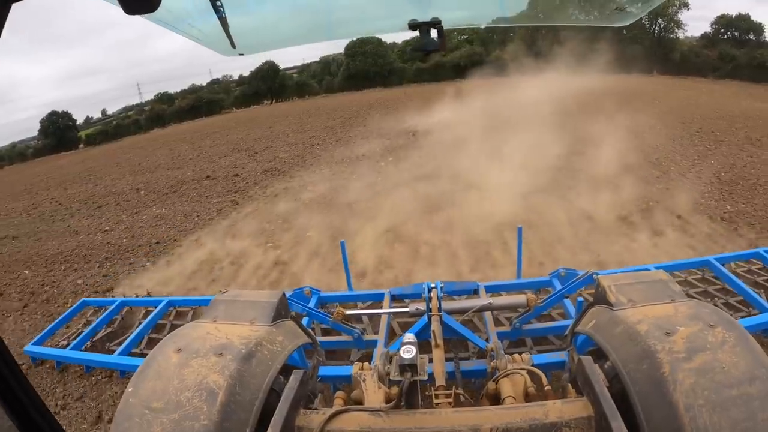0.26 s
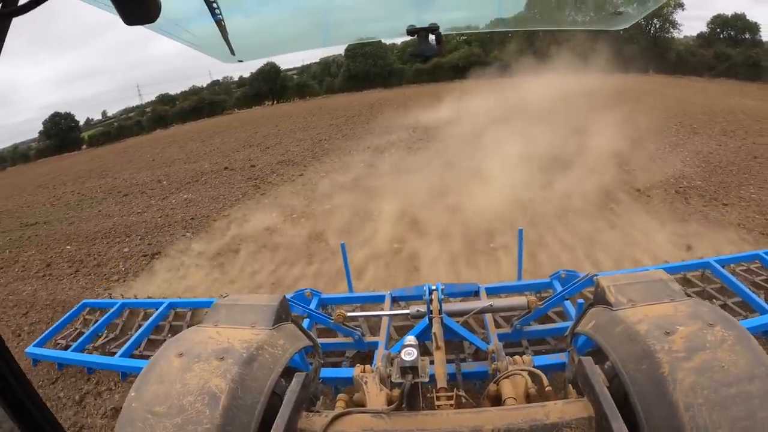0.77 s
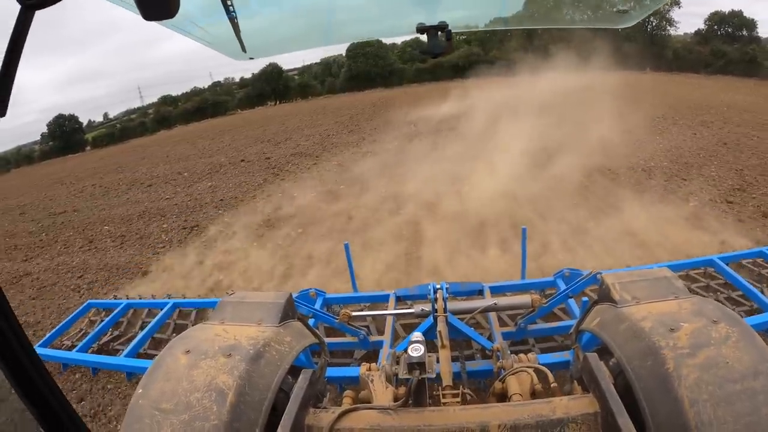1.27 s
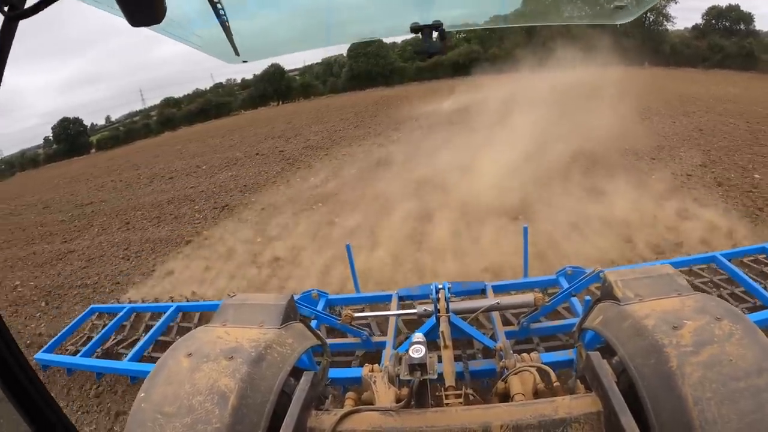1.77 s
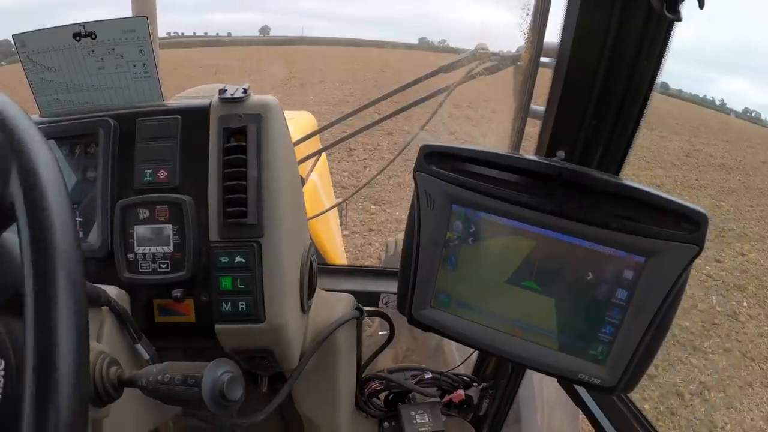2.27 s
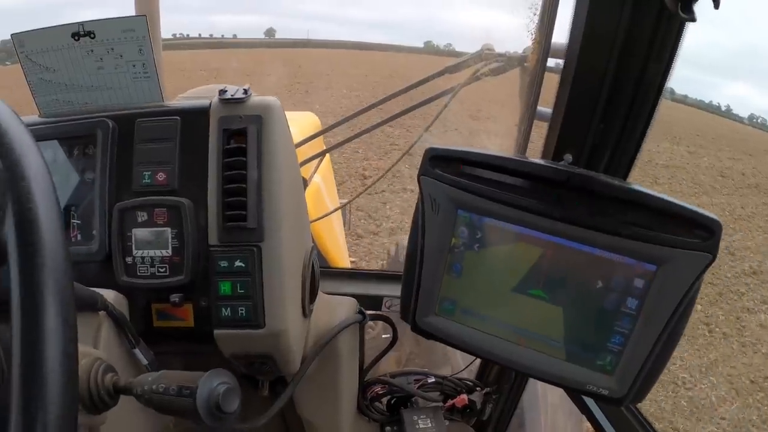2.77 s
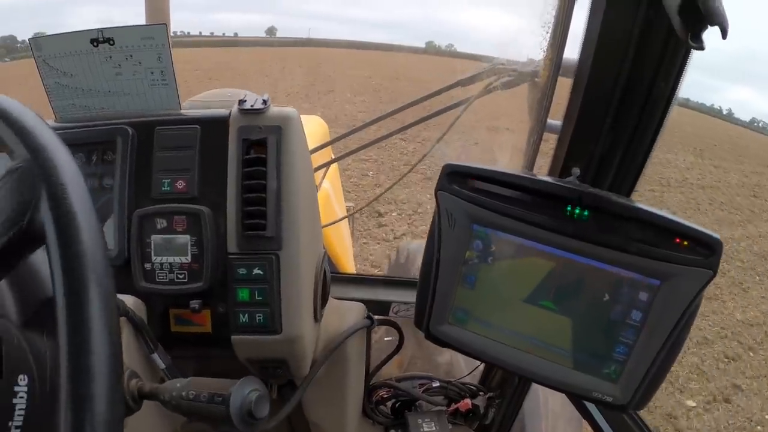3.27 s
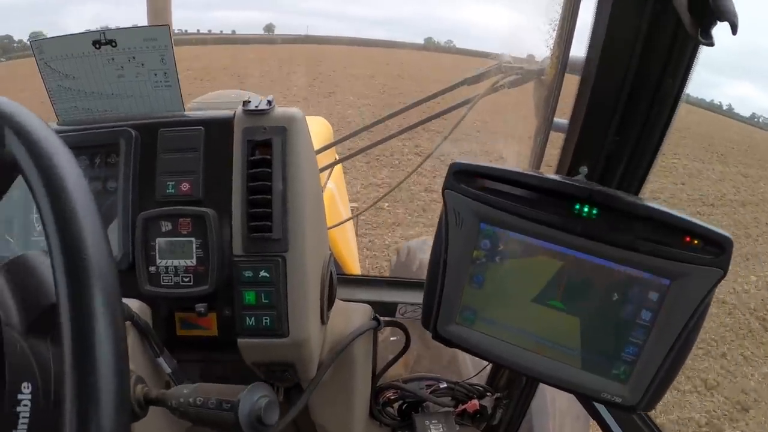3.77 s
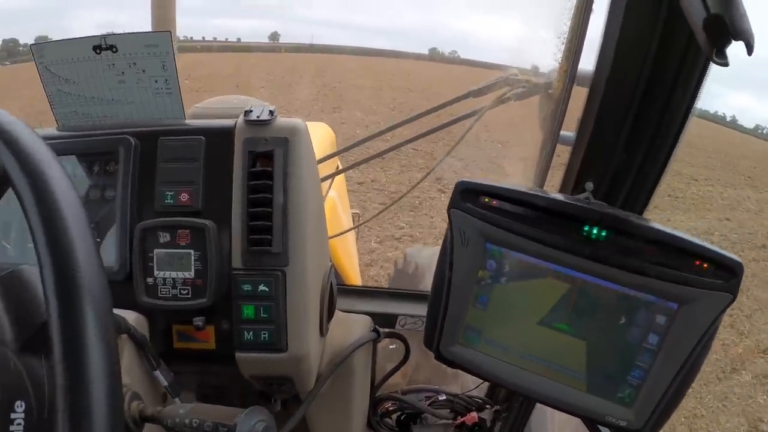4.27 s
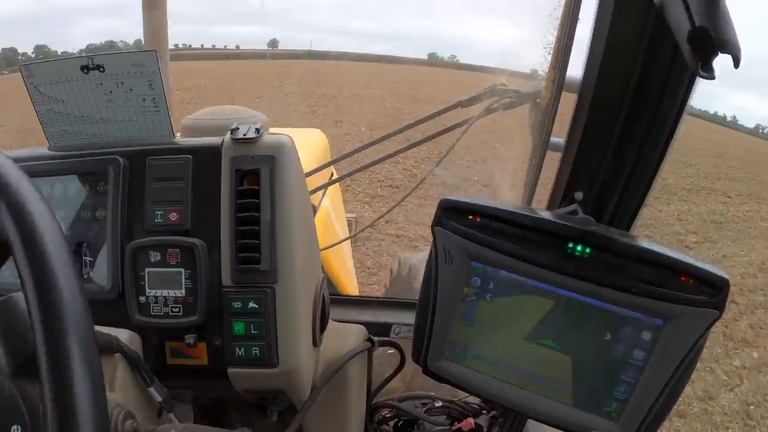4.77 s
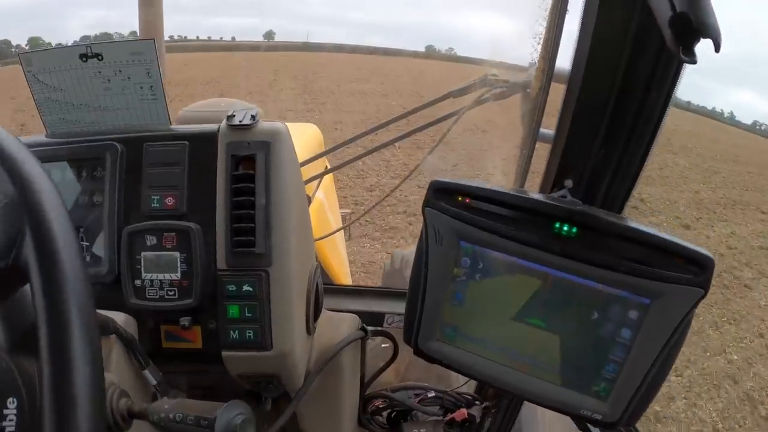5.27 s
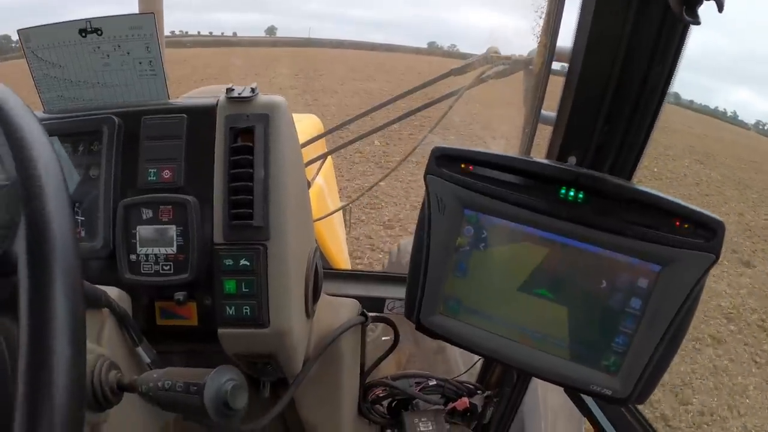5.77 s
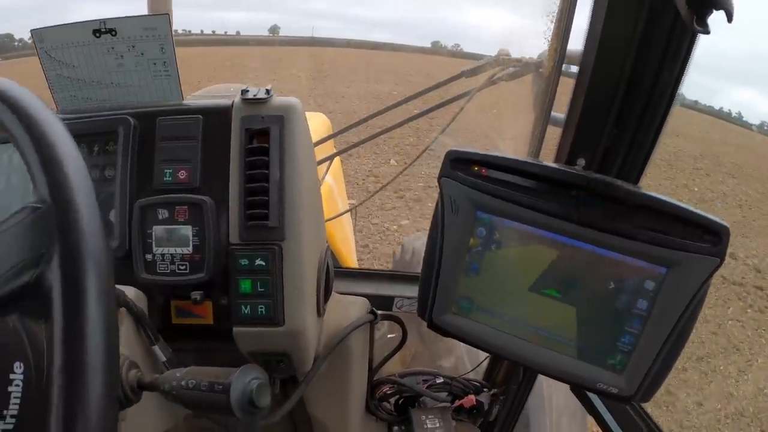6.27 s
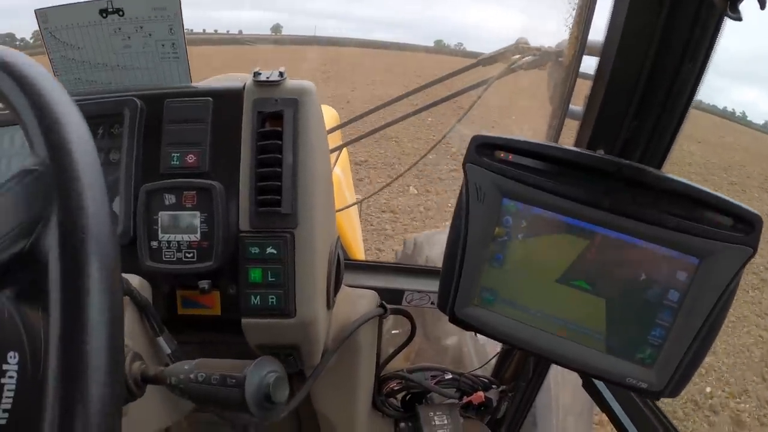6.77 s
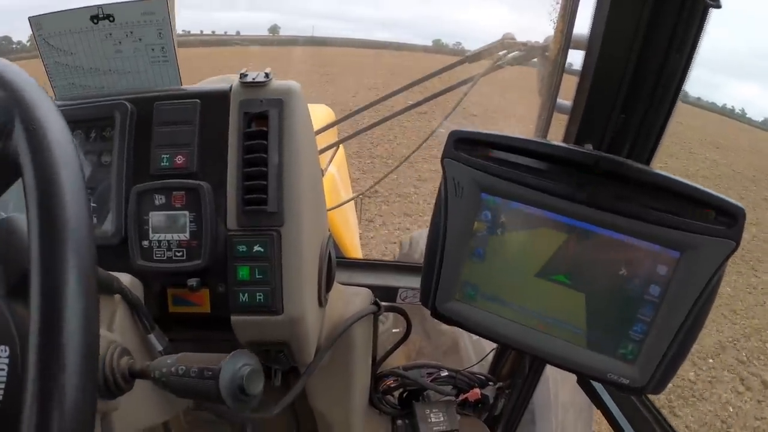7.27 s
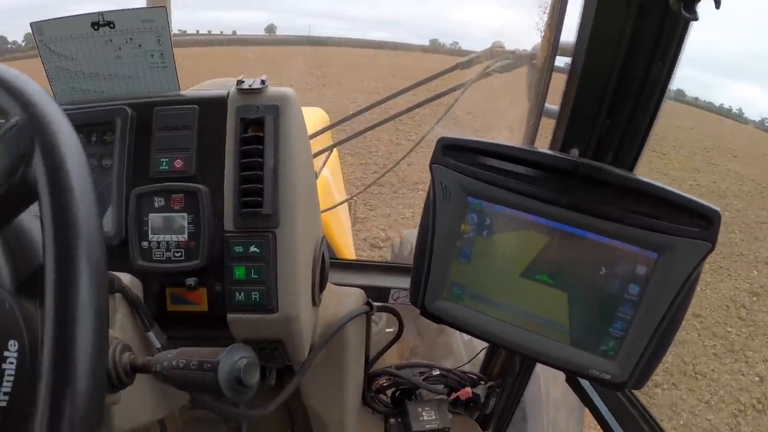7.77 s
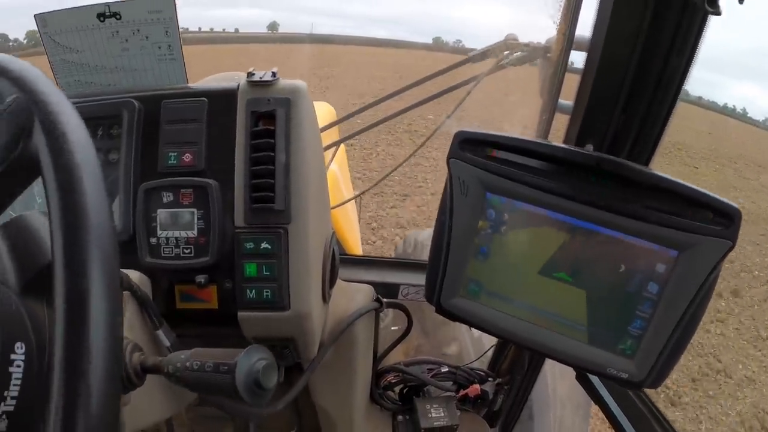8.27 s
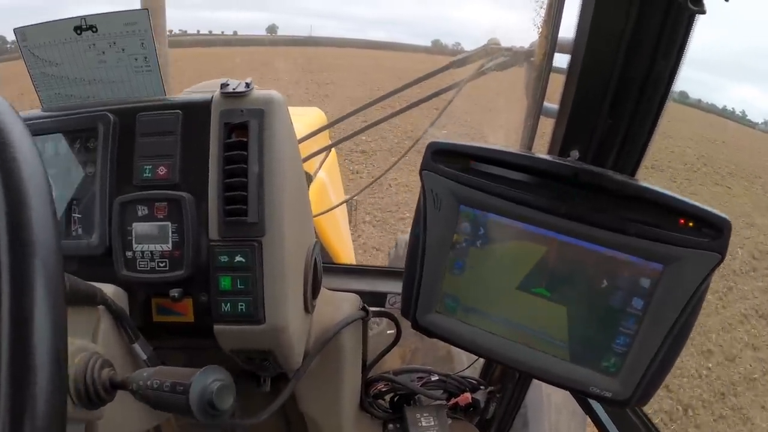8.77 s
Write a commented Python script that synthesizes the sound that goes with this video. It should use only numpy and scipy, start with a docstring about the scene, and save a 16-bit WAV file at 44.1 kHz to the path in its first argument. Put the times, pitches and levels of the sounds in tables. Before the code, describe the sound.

A tractor engine drones steadily under load with harrows scraping and clinking behind, then a cut into the cab brings boomier rumble and pump whine.

```python
"""A six-cylinder tractor drags harrows over dry soil at a nearly steady engine speed.
First, in stereo from the open rear window: sines locked to the engine cycle, a pump whine, shaped noise
for body, roar and the harrow's scrape and bright hiss, and damped sines for the ringing harrow steel.
Then, after a cut to a mono microphone in the cab: engine, hydraulic pump and booming panels rule,
thin gear tones join, the harrow is a dull hiss, and later short gliding squeaks sing out."""
import sys
import numpy as np
from scipy import signal
from scipy.fft import rfft, irfft, next_fast_len
from scipy.io import wavfile
from scipy.ndimage import uniform_filter1d, map_coordinates

SR = 44100
rng = np.random.default_rng(int(sys.argv[2]) if len(sys.argv) > 2 else 0)


def persist_wave(psi):
    """Save psi, clipped to +-1, as 16-bit WAV."""
    counts = np.round(np.clip(psi, -1, 1) * 32767).astype(np.int16)
    wavfile.write(sys.argv[1], SR, np.atleast_2d(counts).T)


N = 397341
T = np.arange(N) / SR
CUT_S = 1.969
IN_CAB = T >= CUT_S
TOP_HZ = 11950  # upper band limit

# Governed engine speed hunting under the changing load: start_s, pump_piston_rate_hz
ENGINE_SPEED = [(0.0, 330), (0.34, 327), (0.74, 331.8), (1.0, 325.4), (1.25, 330.6), (1.7, 326.8),
                (1.79, 325), (1.88, 329.8), (2.37, 326.1), (2.63, 329.8), (2.92, 324.9), (3.22, 332),
                (3.45, 324.4), (3.64, 330.5), (3.81, 326.3), (4.0, 331.3), (4.18, 326.2), (4.36, 332),
                (4.53, 324.5), (4.82, 330.3), (5.04, 323.4), (5.28, 329.3), (5.7, 326.6), (5.9, 331.4),
                (6.37, 324.8), (6.59, 328.7), (6.9, 327.6), (7.05, 323.5), (7.25, 327.4), (7.51, 327),
                (7.8, 320.5), (8.06, 329.4), (8.24, 326.6), (8.44, 324.2), (8.78, 329.6), (9.01, 327.6)]
PISTONS = 24  # pump pulses per engine cycle (all six cylinders fire once, two turns of the crank)
# Engine harmonics: multiple_of_cycle, rear_level_db, cab_level_db
ENGINE_ORDERS = [(2, -45, -33), (3, -38, -34), (4, -46, -41), (6, -32, -28), (8, -46, -41), (9, -34, -47),
                 (10, -54, -44), (11, -50, -40), (12, -39, -32), (13, -56, -46), (14, -51, -42),
                 (20, -50, -49), (30, -57, -62)]
# Hard contacts in the engine: cycle_angle_rad, relative_level_db
KNOCK_CONTACTS = [(.35, 0), (1.08, -3), (3.45, -7), (2.45, -10), (4.6, -10), (5.6, -9)]
GEAR_TEETH, GEAR_DB = 135, -56.5  # tooth contacts per cycle of the whining gear; its mean level in the cab

# Level of the pump whine: start_s, level_db
PUMP_WHINE = [(0.0, -41), (0.2, -38), (0.42, -41.5), (0.56, -43), (0.69, -37.5), (1.85, -39), (1.95, -37.5),
              (1.99, -33), (3.28, -32), (3.77, -37.5), (4.17, -33), (4.4, -39), (4.64, -30.5), (4.97, -33),
              (5.36, -32.5), (6.64, -33), (7.35, -34.5), (7.61, -32), (8.54, -33.5), (8.71, -37),
              (9.0, -30.5)]
# Upper pump tones in the cab: start_s, second_harmonic_db, gear_mesh_db
PUMP_OVERTONES = [(1.99, -46, -40.5), (2.3, -57, -37), (2.72, -38.5, -40), (2.97, -54, -40),
                  (3.73, -48, -41), (3.94, -61, -36.5), (4.28, -41.5, -40), (4.61, -60, -39.5),
                  (5.06, -56, -42), (5.32, -54, -39.5), (5.93, -39.5, -40.5), (6.63, -61, -40.5),
                  (7.04, -57, -52), (7.65, -52, -35), (7.88, -51, -55), (8.18, -47, -35), (8.55, -51, -47),
                  (9.0, -60, -39)]
PUMP_WAVER_DB, THIRD_DB = 0.7, -51.5  # random swing of the whine; level of the third harmonic
MESH = 1.149  # tooth contacts per piston pulse, on the same shaft train

# Ride over the clods: start_s, boom_level_db, drone_level_db
CLOD_RIDE = [(0.0, -33.5, -34.5), (0.7, -29.5, -33), (1.0, -37, -32), (1.3, -28, -36), (1.95, -36, -31.5),
             (1.99, -22.5, -27), (2.3, -24, -28.5), (2.81, -23.5, -25.5), (3.18, -23, -29),
             (3.52, -24, -27.5), (4.09, -24, -27.5), (4.4, -20.5, -28.5), (5.21, -24.5, -26),
             (5.5, -21, -28), (6.6, -25, -28), (6.92, -18.5, -28.5), (7.31, -29, -26.5), (7.52, -20, -30.5),
             (7.79, -22, -26.5), (8.12, -24, -28), (8.42, -22.5, -26), (9.0, -22, -29)]
# Relative spectra of the low boom: pitch_hz, density_db_per_hz
REAR_BOOM_SPECTRUM = [(2, -50), (10, -22), (16, -12), (21, 2), (28, 0), (35, -1), (47, -3), (60, -11),
                      (75, -20), (100, -50), (200, -120)]
CAB_BOOM_SPECTRUM = [(2, -40), (6, -28), (10, -12), (16, -8), (21, 0), (32, -11), (47, -9), (60, -17),
                     (75, -23), (100, -50), (200, -120)]
# Relative spectra of the body drone: pitch_hz, density_db_per_hz
REAR_DRONE_SPECTRUM = [(30, -120), (60, -7), (90, 0), (118, 3), (132, -5), (185, 3.5), (240, -8.5),
                       (275, -2), (300, -8.5), (345, -10), (440, -13.5), (600, -43), (1200, -120)]
CAB_DRONE_SPECTRUM = [(30, -120), (60, -9), (93, -1.5), (108, 2.5), (150, -1), (190, -4), (200, -5.5),
                      (290, -7.5), (310, -12), (355, -15), (600, -73), (1200, -120)]
# Panel resonances of the cab: pitch_hz, width_hz, relative_level_db
PANEL_MODES = [(380.6, 11.9, 0.5), (407, 48, -4.5), (640, 164.6, -10.5), (826, 65, -14), (887, 27, -11),
               (1325, 757, -20.5)]

# Level of the roar at the rear window: start_s, level_db
REAR_ROAR_COURSE = [(0, -34.5), (.25, -33.5), (.5, -33.5), (.68, -32.5), (.85, -34), (1.03, -34),
                    (1.1, -33.5), (1.19, -33.5), (1.26, -34), (1.45, -34), (1.96, -34)]
# Relative spectra of engine bay and tyres: pitch_hz, density_db_per_hz
REAR_ROAR_SPECTRUM = [(240, -37), (400, -6), (496, -7), (587, 0.5), (674, -5.5), (695, -5.5), (798, -3),
                      (989, -3), (1170, 2), (1430, 0), (1780, -6.5), (2260, -4), (2500, -15), (3250, -38),
                      (5500, -120)]
CAB_ROAR_SPECTRUM = [(240, -17), (400, -6), (502, -6.5), (665, -10), (835, -16), (1260, -11), (1550, -14.5),
                     (1890, -11.5), (2150, -19.5), (2600, -20.5), (3380, -30), (5720, -120)]
ROAR_DB, ROAR_SWING_DB = -37, 0.43  # base level in the cab; random swing in both places
ROAR_FOLLOWS = 0.36  # dB of roar per dB of scrape: a harder pull loads engine and tyres
FIRING_DB = 2  # each firing lifts the roar in the cab briefly

# Levels of the bright hiss and of the scrape: start_s, fizz_level_db, scrape_level_db
HARROW_LEVELS = [(0.0, -48.5, -36.5), (0.17, -50, -34), (0.39, -52.5, -34.5), (0.75, -53, -32.5),
                 (0.99, -50, -34.5), (1.06, -48.5, -35), (1.12, -51, -30.5), (1.2, -51, -32.5),
                 (1.33, -55, -35.5), (1.46, -49, -33.5), (1.63, -50.5, -35), (1.83, -49, -34),
                 (1.95, -52, -35), (2.0, -52, -42), (2.14, -60.5, -47), (2.59, -56, -44.5), (3.1, -60, -46),
                 (3.71, -55.5, -45), (4.0, -62, -47.5), (4.12, -61.5, -47), (4.34, -55.5, -46.5),
                 (4.54, -57.5, -44.5), (4.7, -55.5, -45.5), (4.93, -60.5, -46), (5.47, -56, -44.5),
                 (5.81, -60.5, -47.5), (6.49, -58.5, -47), (6.68, -59.5, -47), (7.13, -56.5, -47),
                 (7.54, -59.5, -46), (8.06, -54.5, -44.5), (8.23, -59.5, -45.5), (8.35, -60, -45),
                 (8.52, -59.5, -47), (8.97, -55, -44.5)]
# Relative spectra of the scrape: pitch_hz, density_db_per_hz
REAR_SCRAPE_SPECTRUM = [(1120, -21), (1900, -8), (2260, -5.5), (2890, -4.5), (3650, -8), (4030, -12),
                        (4610, -12), (5000, -18.5), (6500, -28.5), (11000, -120)]
CAB_SCRAPE_SPECTRUM = [(1290, -10), (2200, -2), (2520, -11.5), (2860, -4.5), (3170, -8), (3620, -6),
                       (5000, -17.5), (6500, -61), (11000, -120)]
# Relative spectra of the bright hiss: pitch_hz, density_db_per_hz
REAR_FIZZ_SPECTRUM = [(2940, -36), (5000, -2), (6050, 5.5), (6290, 2), (6690, -12), (7150, 4.5),
                      (7610, 3.5), (8270, -0.5), (8960, -2), (10400, -15.5), (11500, -22), (14900, -57),
                      (22000, -120)]
CAB_FIZZ_SPECTRUM = [(2940, -15.5), (5000, -9.5), (5490, -2), (7050, -9.5), (7910, -9.5), (8650, -15.5),
                     (9570, -13), (11500, -23.5), (14900, -51), (22000, -120)]
# Relative spectrum of what differs between the rear ports: pitch_hz, density_db_per_hz
SIDE_SPECTRUM = [(290, -49), (500, -11), (633, -10), (812, -5), (1060, -22), (1410, -17), (1560, -14),
                 (2230, -2.5), (3660, 3.5), (5360, -4), (6190, -2), (9170, -14), (11500, -40), (14900, -68),
                 (22000, -120)]
SIDES_FLICKER_DB = 4  # random swing of the difference between the sides

# Stones and links ringing the harrow steel: start_s, pitch_hz, level_db, left_over_right_db
STEEL_PINGS = [(0.05, 1330, -24, -1), (0.125, 2350, -25, -1), (0.149, 6140, -34, 4), (0.259, 3273, -25, 3),
               (0.268, 2368, -26, 0), (0.311, 4823, -31, 3), (0.665, 1424, -22, -4),
               (0.816, 6115, -36, 14.5), (0.917, 2325, -25, 10), (1.124, 3746, -27, 0),
               (1.371, 1190, -25, -1), (1.718, 6120, -36, 6), (1.762, 5930, -32, 8), (1.832, 2799, -23, 0),
               (2.099, 9290, -54, 0), (2.537, 3413, -37, 0), (4.253, 3002, -38, 0), (5.462, 4860, -45, 0),
               (6.261, 9431, -52, 0), (7.077, 9400, -55, 0), (7.314, 3789, -42, 0)]
# Balance of the two rear ports: pitch_hz, left_over_right_db
PORT_BALANCE = [(60, 1), (200, 1), (340, .2), (1100, 0), (1900, 1), (3500, 2), (6200, 1.5), (9000, -3)]
LAG_S = 1.8e-5  # the left rear port hears a little later

# Thin tones of gears and valve train in the cab: multiple_of_cycle, level_db
CAB_ORDERS = [(16, -52), (21, -53), (27, -51), (32, -57), (33, -57), (45.67, -57), (50, -56), (54, -56),
              (56, -58), (60, -62), (66, -59), (78, -61), (81, -62), (84, -62), (90, -61), (94, -61),
              (106, -61), (120, -62), (129, -63), (144, -59), (148, -62), (150, -65)]
# Squeaks in the cab: start_s, length_s, start_pitch_hz, end_pitch_hz, level_db (before roughness)
CAB_SQUEAKS = [(3.637, 0.031, 4760, 4750, -44), (3.681, .032, 5520, 5500, -48.5),
               (4.229, .03, 4160, 4170, -48), (7.764, 0.09, 3745, 3720, -50),
               (7.998, 0.099, 3660, 3490, -49), (8.305, 0.026, 2810, 2840, -39),
               (8.306, 0.031, 3870, 3890, -49), (8.662, 0.048, 3517, 3500, -43),
               (8.699, 0.11, 3550, 3620, -52)]
OCTAVE_DB = -22  # second harmonic of a squeak, relative to its fundamental


def amp(db):
    """Decibel law: 20 dB is a factor of ten in amplitude."""
    return 10 ** (np.asarray(db) / 20)


def unit(x):
    """Normalisation to a root mean square of 1."""
    return x / np.sqrt(np.mean(x ** 2) + 1e-20)


def along(points, hz):
    """Logarithmic pitch scale: (Hz, value) points joined along it."""
    f, v = np.transpose(points)
    return np.interp(np.log(hz + 1), np.log(f + 1), v)


def curves(rows):
    """Linear interpolation in time: one curve for each column after the time."""
    s, *cols = np.transpose(rows)
    return [np.interp(T, s, c) for c in cols]


def wobble(rate):
    """Slow random modulation: a smooth curve through rate random knots a second."""
    knots = rng.standard_normal(int(N * rate / SR) + 4)
    return map_coordinates(knots, [T * rate])


def filtered(x, response):
    """Linear filtering: the spectrum of x times a complex response of frequency."""
    m = next_fast_len(N + 8192)
    return irfft(rfft(x, m) * response(np.fft.rfftfreq(m, 1 / SR)), m)[..., :N]


def below(hz):
    """Steep low-pass: damped panels pass little treble."""
    return lambda f: 1 / (1 + (f / hz) ** 8)


def resonance(f, centre, width):
    """Damped resonator: response 1 at its centre, with the given half-power width in Hz."""
    return 1j * f * width / (centre * centre - f * f + 1j * f * width)


def placed(rear, cab):
    """Change of listening place: one value before the cut, another after it."""
    return np.where(IN_CAB, cab, rear)


def coloured(x, rear, cab):
    """Spectral shaping by place: x filtered for each place and normalised to rms 1."""
    rear_sound, cab_sound = [unit(filtered(x, lambda hz: amp(along(p, hz)))) for p in (rear, cab)]
    return placed(rear_sound, cab_sound)


def patchy(patch_db):
    """Non-stationary noise: white noise with patches of random gain in time and frequency."""
    z = signal.stft(rng.standard_normal(N + 512), nperseg=512)[2]
    field = uniform_filter1d(rng.standard_normal(z.shape), size=6, axis=0)
    field = uniform_filter1d(field, size=8, axis=1)
    return signal.istft(z * amp(patch_db * unit(field)), nperseg=512)[1][:N]


def ring(hz, db, t60, rise, size):
    """Exponential decay: damped sines with soft start and end; one row per given frequency."""
    t = np.arange(size) / SR
    decay = amp(db - 60 * t / t60)
    soft_ends = (1 - np.exp(-t / rise)) * (1 - (t / t[-1]) ** 4)
    return decay * soft_ends * np.sin(2 * np.pi * hz * t)


def cycle():
    """Phase is the integral of frequency: angle of the engine cycle in radians."""
    return 2 * np.pi * np.cumsum(curves(ENGINE_SPEED)[0]) / PISTONS / SR


def engine():
    """Harmonics of a periodic source: tones locked to the cycle, each wavering a little in level."""
    turn = cycle()
    out = np.zeros(N)
    for k, rear_db, cab_db in ENGINE_ORDERS:
        level = amp(placed(rear_db, cab_db) + .5 * wobble(3))
        out += np.sqrt(2) * level * np.sin(k * turn + rng.uniform(0, 2 * np.pi))
    return out


def gear_knock():
    """Impulsive excitation of resonators: knocks at set angles of every cycle ring the block."""
    turn = cycle()
    gate = sum(amp(db) * np.exp(35 * (np.cos(turn - angle) - 1)) for angle, db in KNOCK_CONTACTS)
    contact = np.sin(GEAR_TEETH * turn + wobble(30)) + 5 * patchy(.5)
    knocks = gate * amp(1.5 * wobble(10)) * contact

    def block(f):
        modes = [(1760, 150, .6), (1860, 140, 1), (2000, 220, .8)]  # Hz, width Hz, gain before squaring
        return sum((gain * resonance(f, centre, width)) ** 2 for centre, width, gain in modes)

    return amp(placed(-58, -49)) * unit(filtered(knocks, block))


def pump():
    """Pulsating flow: piston pulses geared to the engine; the cab adds harmonics and a rough gear mesh."""
    turn = PISTONS * cycle() + 0.11 * wobble(12)
    second_db, mesh_db = curves(PUMP_OVERTONES)
    whine = amp(curves(PUMP_WHINE)[0] + PUMP_WAVER_DB * wobble(7.7)) * np.sin(turn)
    upper = np.zeros(N)
    for k, level_db in [(2, second_db), (3, THIRD_DB)]:
        upper += IN_CAB * amp(level_db + 1.8 * wobble(8)) * np.sin(k * turn + .55 * wobble(25))
    mesh = IN_CAB * amp(mesh_db + 1.7 * wobble(29)) * np.sin(MESH * turn + 0.61 * wobble(15))
    return np.sqrt(2) * (whine + upper + mesh)


def body():
    """Forced vibration: jolts from the ground shake cab air, chassis and panels, as shaped noise."""
    boom_db, drone_db = curves(CLOD_RIDE)
    boom = amp(boom_db) * coloured(rng.standard_normal(N), REAR_BOOM_SPECTRUM, CAB_BOOM_SPECTRUM)
    drone = amp(drone_db) * coloured(rng.standard_normal(N), REAR_DRONE_SPECTRUM, CAB_DRONE_SPECTRUM)

    def panel_response(f):
        # neighbouring modes move in opposite phase
        modes = sum((-1) ** k * amp(db) * resonance(f, centre, width)
                    for k, (centre, width, db) in enumerate(PANEL_MODES))
        return modes * below(1700)(f)

    panels = IN_CAB * amp(-37.0) * unit(filtered(patchy(0.93), panel_response))
    return boom + drone + panels


def roar():
    """Broadband radiation: engine and tyre noise; in the cab it swells with pull and firing."""
    scrape_db = curves(HARROW_LEVELS)[1]
    firing_db = FIRING_DB * np.cos(3 * cycle()) ** 6  # six peaks a cycle
    pull_db = ROAR_FOLLOWS * (scrape_db - scrape_db[IN_CAB].mean())
    cab_db = ROAR_DB + firing_db + pull_db
    level = amp(placed(curves(REAR_ROAR_COURSE)[0], cab_db) + ROAR_SWING_DB * wobble(4.8))
    return level * coloured(patchy(0.59), REAR_ROAR_SPECTRUM, CAB_ROAR_SPECTRUM)


def chinks(count=13000):
    """Superposition of random impacts: countless small rings of spring steel."""
    when, pitch, size = rng.random((count, 3)).T
    pitch, size = pitch[:, None], size[:, None]
    rows = ring(1000 + 10000 * pitch ** 1.3, 6 * size ** 2, .018 + .035 * size, .002, size=SR // 56)
    at = (when * N).astype(int)[:, None] + np.arange(rows.shape[1])
    return unit(np.bincount(at.ravel(), rows.ravel())[:N])


def harrow_noise():
    """Friction noise: a scrape with a bright hiss above it, noise and chinks shaken together."""
    fizz_db, scrape_db = curves(HARROW_LEVELS)
    shake = amp(placed(.9, .4) * wobble(12) + .7 * wobble(45))
    grit = shake * (patchy(.8) + placed(.55, .3) * chinks())
    scrape = amp(scrape_db) * coloured(grit, REAR_SCRAPE_SPECTRUM, CAB_SCRAPE_SPECTRUM)
    fizz = amp(fizz_db) * coloured(grit, REAR_FIZZ_SPECTRUM, CAB_FIZZ_SPECTRUM)
    # the wide harrow reaches the two rear ports from all sides; the cab microphone is mono
    side_grit = shake * (patchy(2.4) + 0.4 * chinks())
    side_level = amp(scrape_db - 7.5 + SIDES_FLICKER_DB * wobble(21.76)) * ~IN_CAB
    across = side_level * coloured(side_grit, SIDE_SPECTRUM, SIDE_SPECTRUM)
    return scrape + fizz, across


def pings():
    """Free vibration after impact: the clearest single rings of the steel, panned by level."""
    out = np.zeros((2, N + SR))
    for s, hz, db, pan_db in STEEL_PINGS:
        tone = ring(hz, db, 0.091, 0.0058, size=SR // 16)
        start = round(s * SR)
        out[:, start:start + len(tone)] += tone * amp([[pan_db / 2], [-pan_db / 2]])
    return out[:, :N]


def gear_tones():
    """Shaft-locked harmonics: thin tones come and go in the cab; one gear whine pulses once a cycle."""
    turn = cycle()
    thin = np.zeros(N)
    for k, db in CAB_ORDERS:
        thin += amp(db + 3 * wobble(4)) * np.sin(k * turn + rng.uniform(0, 2 * np.pi))
    whine_level = amp(GEAR_DB + 6 * np.cos(turn - 2.2) + 1.5 * wobble(12))
    whine = whine_level * np.sin(GEAR_TEETH * turn + 1.5 * wobble(35))
    return np.sqrt(2) * IN_CAB * (thin + whine)


def squeaks():
    """Friction-driven oscillation: rubbing parts sing briefly, with a rough gliding pitch."""
    out = np.zeros(N)
    rough_hz, rough_db = 30 * wobble(150), 3 * wobble(110) - 1
    for s, length, start_hz, end_hz, db in CAB_SQUEAKS:
        u = np.clip((T - s) / length, 0, 1)  # progress through the squeak
        turn = 2 * np.pi * np.cumsum(start_hz + (end_hz - start_hz) * u + rough_hz) / SR
        envelope = np.sqrt(abs(np.sin(np.pi * u))) * (u < 1)
        tone = np.sin(turn) + amp(OCTAVE_DB) * np.sin(2 * turn)
        out += amp(db + rough_db) * envelope * tone
    return out


def port_difference(hz):
    """Level and time differences: half the left-right difference as a share of the middle."""
    half_level = along(PORT_BALANCE, hz) * np.log(10) / 40
    half_lag = 1j * np.pi * hz * LAG_S
    return np.tanh(half_level - half_lag)


def scene():
    """Superposition: sources add in the middle; differences between ports spread the rear stereo."""
    middle, across = harrow_noise()
    middle = middle + engine() + gear_knock() + pump() + body() + roar() + gear_tones() + squeaks()
    across = across + ~IN_CAB * filtered(middle, port_difference)
    return np.array([middle + across, middle - across]) + pings()


def record(dry):
    """Band limitation: the treble fades out over the last 350 Hz below the limit."""
    return filtered(dry, lambda hz: np.clip((TOP_HZ - hz) / 350, 0, 1) ** 2)


dry = scene()
out = record(dry)
persist_wave(out)
```